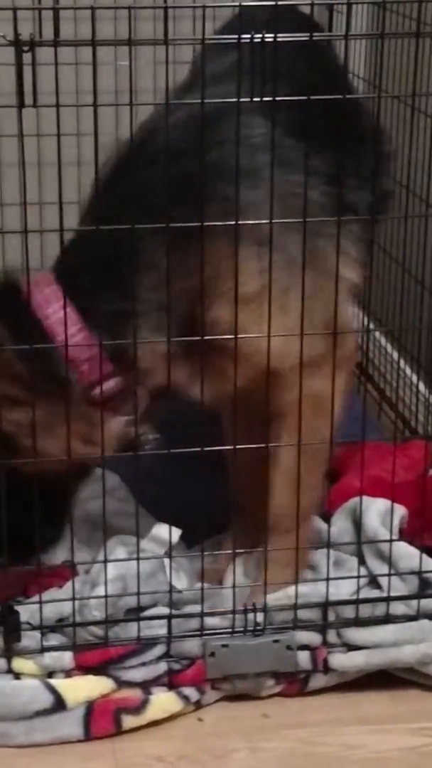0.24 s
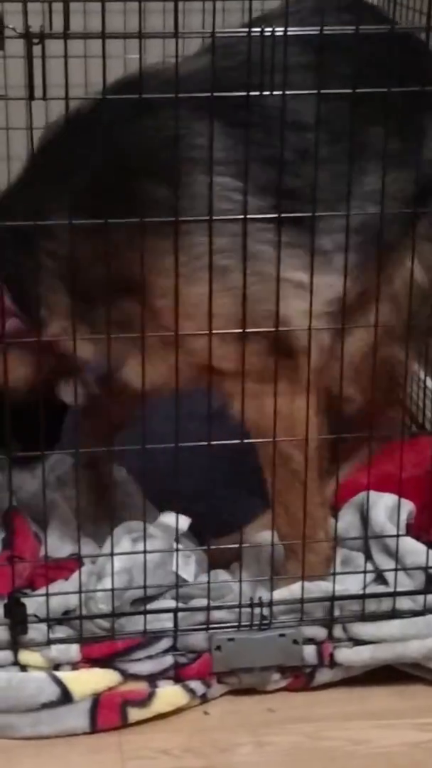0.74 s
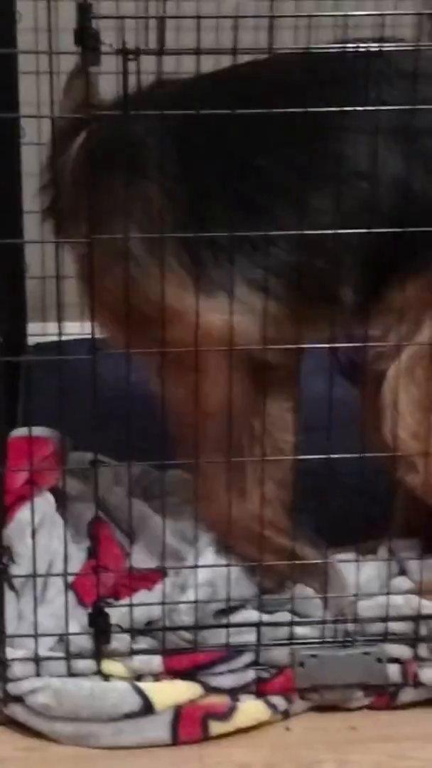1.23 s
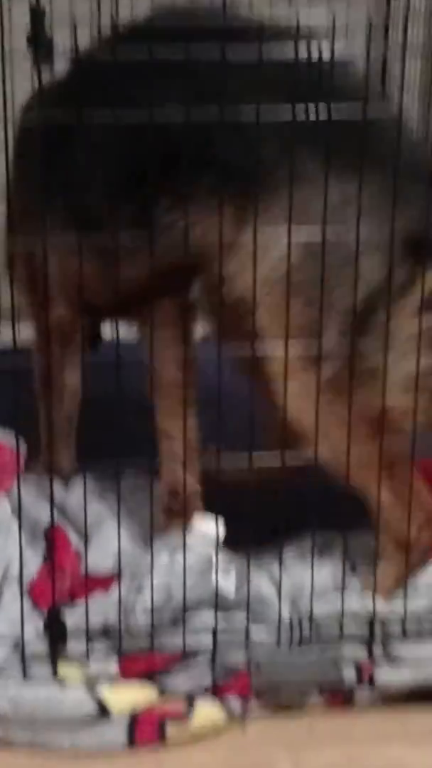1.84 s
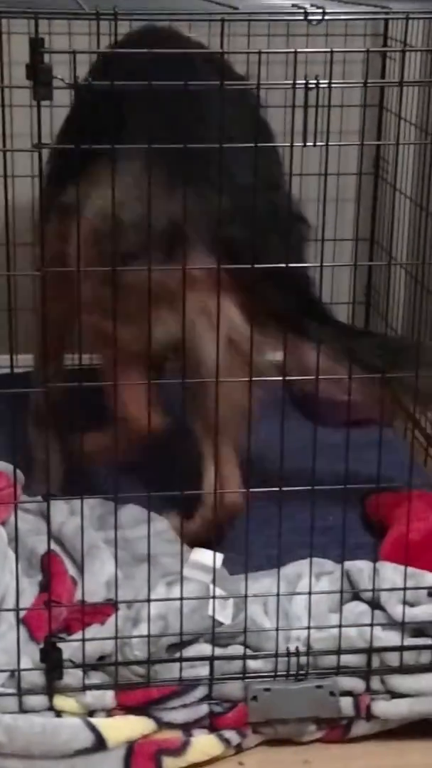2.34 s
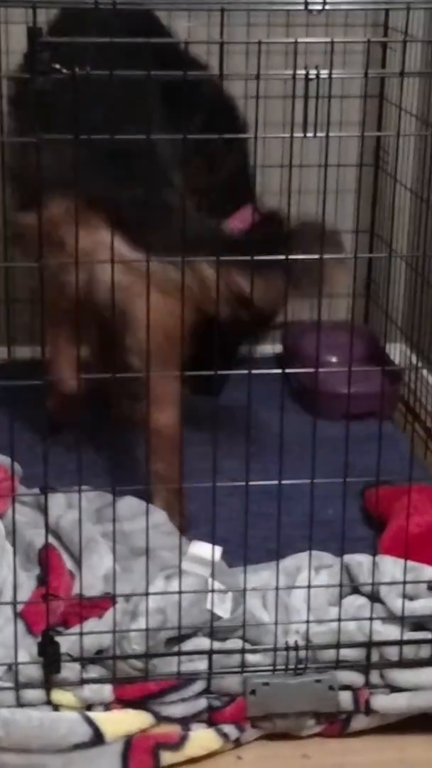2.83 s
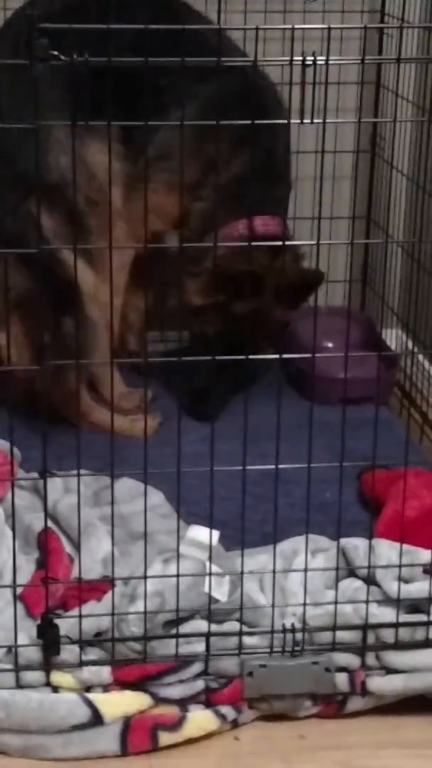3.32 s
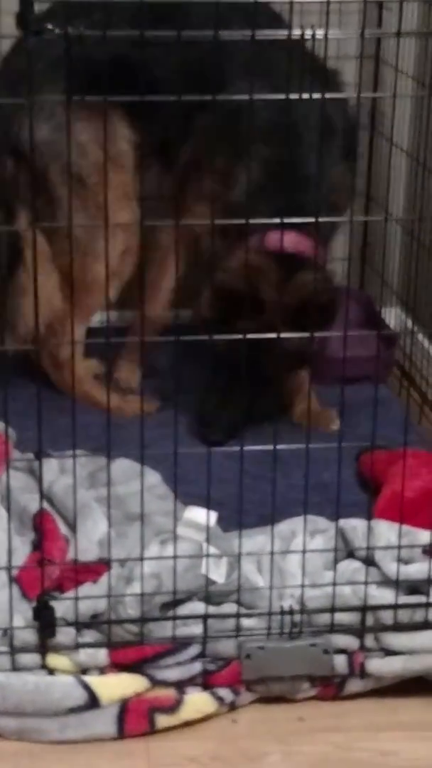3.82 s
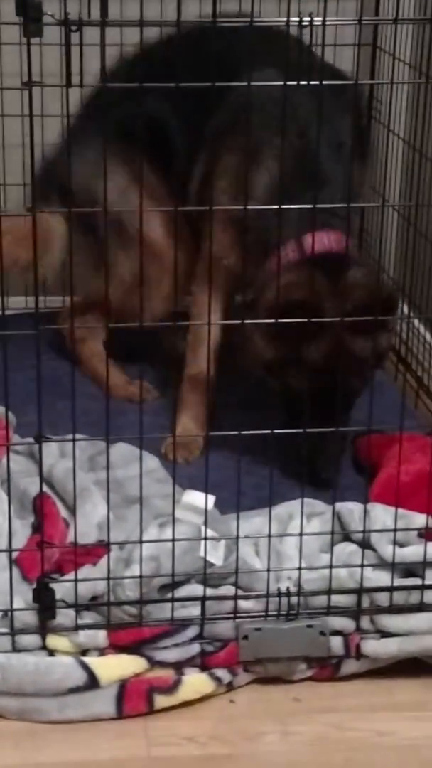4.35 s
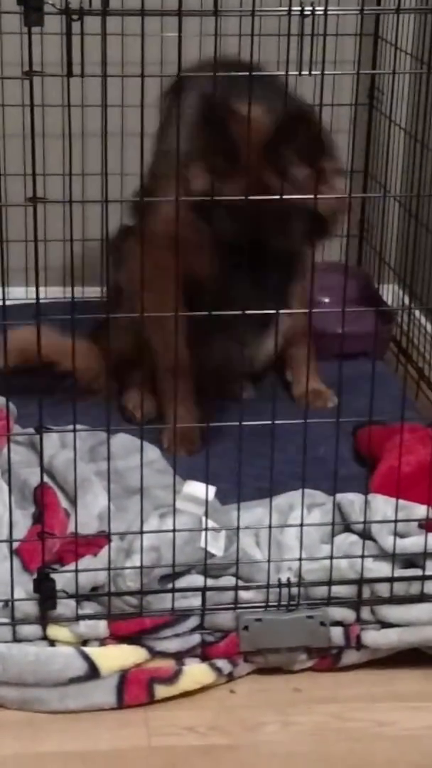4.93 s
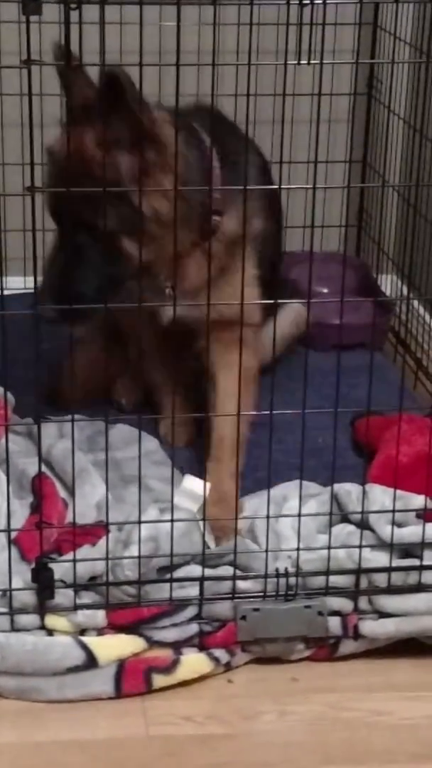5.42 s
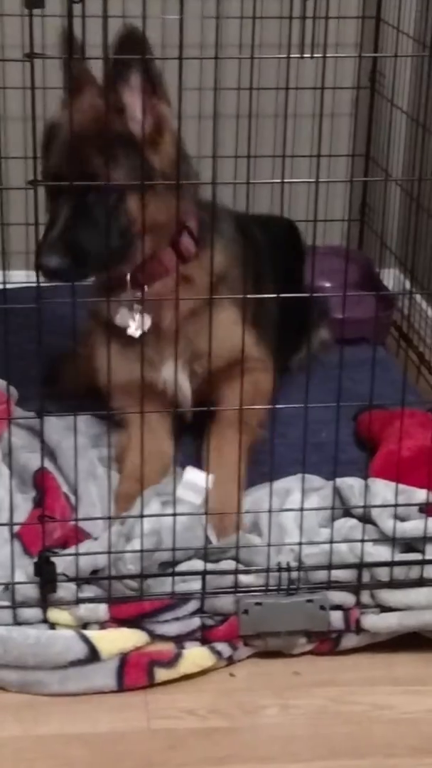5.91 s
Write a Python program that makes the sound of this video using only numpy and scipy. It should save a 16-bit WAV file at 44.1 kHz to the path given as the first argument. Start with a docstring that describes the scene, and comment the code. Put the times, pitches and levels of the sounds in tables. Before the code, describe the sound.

A large dog turns around inside a wire crate in a living room. Its paws thud unevenly on the padded floor tray, which knocks against the frame and makes the wire panels chatter, while a blanket rustles softly between steps. Its nose whistles faintly twice early on, and the heaviest step lands after about two seconds. Near the end the dog lies down with one faint tag clink. The room rings briefly after each bump.

```python
"""A big dog starts to turn round in a wire crate in a living room, its nose whistling faintly twice.
Each paw thuds on the padded floor tray, which knocks on the frame and makes the wire panels chatter.
The heaviest step lands just after two seconds, and the blanket rustles as the paws drag between steps.
Near the end the dog lies down and its collar tag clinks once.
All along, the room rings briefly after each bump, over a soft hush of air."""
import sys
import numpy as np
from scipy import signal
from scipy.fft import rfft, irfft, next_fast_len
from scipy.io import wavfile

SR = 44100
rng = np.random.default_rng(int(sys.argv[2]) if len(sys.argv) > 2 else 0)


def dump_mix(stems):
    """Bounce the given channels to the path in sys.argv[1] as a 16-bit WAV at rate SR."""
    frames = np.atleast_2d(stems).T  # one column per channel
    limited = np.clip(frames, -1, 1)  # hard clip at full scale
    pcm = np.round(limited * 32767).astype(np.int16)
    wavfile.write(sys.argv[1], SR, pcm)


N = 272529
TIME = np.arange(N) / SR   # seconds, for the whole scene
HIT_TIME = np.arange(int(.8 * SR)) / SR   # seconds, for one hit


# Paws and body landing on the tray. Levels compare one step with another; build_s is how slowly it lands.
# start_s, thud_db, pitch_hz, rattle_db, treble_db, knock_db, build_s
STEPS = [(0.16, -26.5, 166, -64, -47, -63, 0.0045), (0.212, -23.5, 274, -40, -33, -39, 0.011),
         (0.514, -37, 172, -65, -43, -65, 0.014), (0.952, -35, 99, -62, -40, -49, 0.0081),
         (1.035, -36.5, 143, -63, -42, -67, 0.009), (1.241, -36, 80, -51, -25, -62, 0.0079),
         (1.665, -25, 209, -45, -30, -40, 0.0078), (1.929, -32, 196, -59, -40, -40.5, 0.0077),
         (2.02, -16.5, 296, -34, -21, -24, 0.0089), (2.143, -29, 230, -57, -36, -39.5, 0.0061),
         (2.213, -3, 254, -22, -25.5, -24.5, 0.01), (2.562, -19, 156, -37.5, -28.5, -30.5, 0.0071),
         (2.967, -22.5, 201, -44, -34, -37.5, 0.011), (3.047, -29.5, 180, -48, -34, -40, 0.0087),
         (3.196, -32.5, 196, -61, -39, -47.5, 0.01), (3.519, -25, 116.5, -54.5, -38, -58, 0.0061),
         (3.737, -17, 114, -35, -30.5, -27, 0.009), (4.199, -17.5, 185, -36.5, -27.5, -29.5, 0.0088),
         (4.718, -28.5, 287, -60, -38, -43, 0.012), (4.841, -41, 188, -54, -29, -42.5, 0.0066),
         (5.333, -13.5, 284, -32, -31.5, -28.5, 0.008), (5.54, -33.5, 197, -54.5, -37, -44, 0.0065),
         (5.794, -24, 179, -41.5, -40.5, -35, 0.0049), (5.945, -23.5, 224, -39, -36.5, -37, 0.0082),
         (6.049, -20.5, 210, -41.5, -36, -36, 0.0095)]

def footfalls(thud_gain_db=19.5, knock_gain_db=20, rattle_gain_db=26, toes_early_s=.00875, bounce_s=.012):
    """The toes touch, the weight lands with a thud, knock and rattle, and the tray bounces once."""
    tray, frame = np.zeros((2, N))
    for start_s, thud_db, pitch_hz, rattle_db, treble_db, knock_db, build_s in STEPS:
        tilt_db_per_octave = (treble_db + 14.5) / 2.6
        tilt_db_per_octave += .11 * max(rattle_db + 31, 0)   # hard rattles are brighter
        bounce_db = -5 - .3 * max(-19 - thud_db, 0)   # light steps bounce less
        bounce_hz = min(pitch_hz, 169.4)   # no higher than the tray's own pitch
        for at_s, db, hz in (start_s, 0, pitch_hz), (start_s + bounce_s, bounce_db, bounce_hz):
            add(tray, at_s, from_db(thud_db + thud_gain_db + db) * thud(hz, build_s))
        for at_s, db in (start_s - toes_early_s, -6.5), (start_s, 0):
            add(frame, at_s, from_db(knock_db + knock_gain_db + db) * knock(build_s))
        for at_s, db in (start_s, 0), (start_s + bounce_s, -14.5):   # the bounce barely shakes the frame
            chatter = rattle(tilt_db_per_octave, delay_s=1.5 * build_s)
            add(frame, at_s, from_db(rattle_db + rattle_gain_db + db) * chatter)
    return tray, frame


# The tones the floor tray rings with: pitch_hz, level_db, ring_s (time to fade by 60 dB)
TRAY_TONES = [(82, -10, .22), (125, -5, .13), (168, 0, .17), (192, -6, .12), (248, 1, .17), (298, -2, .14),
              (345, -4, .12), (410, -7, .1), (475, -6, .12), (532, -3, .15), (630, -11, .12)]

def thud(pitch_hz, build_s, pads_db=-3, ring_db=-3, wobble_share=.17):
    """The tray bends under the soft pads of a paw, then rings on with its tones near that pitch."""
    wobble = np.interp(HIT_TIME * pitch_hz, np.arange(999), rng.standard_normal(999))
    cycles = np.cumsum(pitch_hz * (1 + wobble_share * wobble)) / SR
    bend = paw_force(.68 * build_s) * np.sin(2 * np.pi * cycles)
    pads = paw_force(build_s) * rng.standard_normal(len(HIT_TIME))
    pads = colour(pads, [(40, -40.5), (80, -.5), (300, .5), (450, -6), (1500, -68.5), (6000, -98)])
    fade_in = 1 - np.exp(-(HIT_TIME / build_s) ** 2)
    ring = resonance(struck(TRAY_TONES, uneven_db=3), pitch_hz, width_hz=1.09 * pitch_hz) * fade_in
    mix = unit_energy(bend) + from_db(pads_db) * unit_energy(pads) + from_db(ring_db) * unit_energy(ring)
    return unit_energy(mix)


# The tone colour of the tray's hollow knock: pitch_hz, level_db
KNOCK_COLOUR = [(100, -10.5), (280, -7), (380, 2), (520, 2.5), (620, -5), (760, -11.5), (1500, -18.5),
                (6000, -89)]

def knock(build_s):
    """The hollow middle of the tray is drummed as it flattens against the floor."""
    burst = paw_force(1.21 * build_s) * rng.standard_normal(len(HIT_TIME))
    return unit_energy(colour(burst, KNOCK_COLOUR))


# The tone colour of tray and wires clacking on the frame: pitch_hz, level_db
CLACK_COLOUR = [(100, -13), (300, -9), (520, -3), (740, -9.5), (1050, 5), (1500, 1), (2300, -1.5),
                (2800, -4), (3400, -8.5), (4500, -10.5), (6500, -27.5), (9000, -35), (15000, -59)]
# The strongest tones of the wire panels, muffled by the bedding: pitch_hz, level_db, ring_s
WIRE_TONES = [(941, -3, .22), (1022, -3, .22), (1078, -1, .28), (1275, -2, .25), (1380, -2, .25),
              (1532, 0, .22), (1690, -2, .22), (1915, -3, .2), (2335, -3, .15), (2445, 0, .12),
              (3188, 3, .06)]

def rattle(tilt_db_per_octave, delay_s, taps_per_s=6000, bump_s=.01, settle_s=.0088, wires_db=-6):
    """Loose joints chatter at once; then the tray bumps the frame and sets the wire panels ringing."""
    bump = np.exp(-((HIT_TIME - delay_s) / bump_s) ** 2)
    chatter = .33 * np.exp(-HIT_TIME / settle_s)
    taps = random_clicks(len(HIT_TIME), taps_per_s) * (bump + chatter)
    tilted = [(hz, db + tilt_db_per_octave * np.log2(np.clip(hz, 500, 6000) / 1500))
              for hz, db in CLACK_COLOUR]
    clack = colour(taps, tilted)
    wires = np.interp(HIT_TIME - delay_s, HIT_TIME, struck(WIRE_TONES, uneven_db=4), left=0)
    wires = colour(wires, [(3500, -23), (7000, -19)])   # favours the treble a little
    return unit_energy(unit_energy(clack) + from_db(wires_db) * unit_energy(wires))


def paw_force(build_s):
    """The push of a paw swells to 1 and eases off."""
    progress = HIT_TIME / max(build_s, .002)
    return (progress * np.exp(1 - progress)) ** 2


# How hard the paws drag, and how much the blanket slides: time_s, level_db
PAW_DRAG = [(0.0, -58), (0.29, -48.5), (1.15, -55.5), (1.38, -62), (1.65, -57), (2.06, -47), (2.2, -37.5),
            (2.55, -48), (2.75, -53.5), (3.51, -54), (3.72, -42), (4.01, -58), (4.23, -52), (4.34, -51.5),
            (4.87, -51), (5.83, -56.5), (6.02, -48), (6.18, -46)]
BLANKET_SLIDE = [(0.0, -62), (0.31, -59), (0.46, -64.5), (0.74, -64), (1.24, -60.5), (1.44, -63),
                 (1.69, -77), (1.86, -62), (2.01, -67), (2.2, -66), (2.67, -59), (3.42, -65.5), (3.7, -60),
                 (4.58, -60.5), (4.78, -59.5), (5.39, -61.5), (5.76, -60), (6.18, -65)]
# The tone colours of the paws' dull scuff and the blanket's swish: pitch_hz, level_db
SCUFF_COLOUR = [(50, -10), (120, 5), (260, 2), (400, -4), (700, -16), (1200, -41), (4000, -54.5)]
SWISH_COLOUR = [(150, -19), (500, 0.5), (750, 5), (1000, 5.5), (1350, 2.5), (1700, -4), (2600, -12.5),
                (4000, -20), (8000, -29.5), (15000, -41)]

def bedding(scuff_db=-2.5, swish_db=-1, lumpy_db=1, patchy_db=2.5, snags_per_s=5000):
    """Paws drag in small dull lurches, while threads of the blanket catch and slip."""
    lurches = rng.standard_normal(N) * from_db(lumpy_db * drift(turns_per_s=28))
    scuff = unit_rms(colour(lurches, SCUFF_COLOUR))
    snags = random_clicks(N, snags_per_s) * from_db(patchy_db * drift(turns_per_s=18))
    swish = unit_rms(colour(snags, SWISH_COLOUR))
    scuff *= from_db(over_time(PAW_DRAG) + scuff_db)
    swish *= from_db(over_time(BLANKET_SLIDE) + swish_db)
    return scuff + swish


# The tones of the metal tag: pitch_hz, level_db, ring_s
TAG_TONES = [(5700, -2, .015), (6050, -4, .015), (7250, -2, .015), (7700, -5, .015), (12300, -6, .015),
             (14400, -6, .015), (14950, -7, .12)]
# When the tag clinks: start_s, level_db
CLINKS = [(5.865, -53.5)]

def collar_tag():
    """A small metal tag taps the ring it hangs from."""
    out = np.zeros(N)
    for start_s, level_db in CLINKS:
        clink = struck(TAG_TONES, uneven_db=3)
        add(out, start_s, from_db(level_db) * clink / np.max(np.abs(clink)))
    return out


# Faint whistles from the dog's nose: middle_s, length_s, level_db
NOSE_WHISTLES = [(.45, .11, -61), (1.066, 0.13, -62.5)]

def nose(pitch_hz=1340, width_hz=160):
    """Air through the dog's nose makes a breathy note that swells and fades."""
    swells = sum(from_db(level_db) * np.exp(-(2 * (TIME - middle_s) / length_s) ** 2)
                 for middle_s, length_s, level_db in NOSE_WHISTLES)
    return narrow_noise(pitch_hz, width_hz) * swells


# How long the room rings, from low sounds to high: pitch_hz, ring_s
ROOM_RING = [(100, 0.39), (300, 0.37), (1000, 0.46), (3000, 0.42), (6000, 0.35), (14000, 0.1)]

def room_echo(sound, build_s=.00067):
    """The room stores the energy in each band of pitches and gives it back as noise that dies away."""
    edges_hz = np.geomspace(60, 16000, 25)
    noise = rng.standard_normal((2, N))
    out = np.zeros(N)
    for k, band_hz in enumerate(zip(edges_hz, edges_hz[1:])):
        band_filter = signal.butter(3, band_hz, "band", fs=SR, output="sos")
        energy = signal.sosfilt(band_filter, sound + 1e-12 * noise[0]) ** 2
        ring_s = at_pitch(ROOM_RING, np.sqrt(np.prod(band_hz)))
        for smooth_s in build_s, ring_s / np.log(1e6):   # a quick rise, then a slow fade
            keep = np.exp(-1 / (smooth_s * SR))
            energy = signal.lfilter([1 - keep], [1, -keep], energy)
        out += np.sqrt(energy) * unit_rms(signal.sosfilt(band_filter, noise[k % 2]))
    return out


# The tone colour of still room air with a faint hiss: pitch_hz, level_db
AIR_COLOUR = [(12, -45.5), (20, 3.5), (70, -2), (119, 2.5), (207, -6.5), (298, -5.5), (393, -17),
              (465, -7.5), (614, -22.5), (1230, -21), (2150, -27.5), (9130, -40.5), (10500, -41),
              (15500, -43)]

def background(air_db=-54, rumble_db=-59, whine_db=-88):
    """Room air, a low rumble of the floor as the dog shifts its weight, and a thin electrical whine."""
    air = unit_rms(colour(rng.standard_normal(N), AIR_COLOUR))
    rumble = narrow_noise(pitch_hz=28, width_hz=30)
    whine = unit_rms(resonance(rng.standard_normal(N), pitch_hz=10750, width_hz=250))
    drag_db = over_time(PAW_DRAG)
    swell_db = .44 * (drag_db - drag_db.mean())
    return from_db(air_db) * air + from_db(rumble_db + swell_db) * rumble + from_db(whine_db) * whine


def struck(tones, uneven_db):
    """A struck object rings with fading tones; each hit shares its strength among them differently."""
    pitch_hz, level_db, ring_s = np.transpose(tones)[:, :, None]
    gain = from_db(level_db + uneven_db * rng.standard_normal(pitch_hz.shape))
    gain *= rng.choice([-1, 1], pitch_hz.shape)
    fade = np.exp(-np.log(1000) * HIT_TIME / ring_s)
    return unit_energy(np.sum(gain * fade * np.sin(2 * np.pi * pitch_hz * HIT_TIME), axis=0))


def colour(sound, levels):
    """Make each pitch louder or softer, following rows of pitch_hz, level_db."""
    size = 2 * next_fast_len(len(sound))
    gains = from_db(at_pitch(levels, np.fft.rfftfreq(size, 1 / SR)))
    cepstrum = irfft(np.log(gains))
    # Folding this onto its first half keeps the filter from sounding before the hit.
    cepstrum[1:size // 2] *= 2
    cepstrum[size // 2 + 1:] = 0
    return irfft(rfft(sound, size) * np.exp(rfft(cepstrum)))[:len(sound)]


def resonance(sound, pitch_hz, width_hz):
    """Bring out the part of a sound near one pitch."""
    keep = np.exp(-np.pi * width_hz / SR)
    return signal.lfilter([1, 0, -1], [1, -2 * keep * np.cos(2 * np.pi * pitch_hz / SR), keep ** 2], sound)


def narrow_noise(pitch_hz, width_hz):
    """Noise filtered twice around one pitch."""
    once = resonance(rng.standard_normal(N), pitch_hz, width_hz)
    return unit_rms(resonance(once, pitch_hz, width_hz))


def random_clicks(samples, per_s):
    """Tiny clicks of random timing and strength."""
    return (rng.random(samples) < per_s / SR) * rng.standard_normal(samples)


def drift(turns_per_s):
    """A curve that wanders at random, about 1 in size."""
    return unit_rms(np.interp(TIME * turns_per_s, np.arange(1000), rng.standard_normal(1000)))


def at_pitch(table, pitch_hz):
    """Read between a table's rows, with octaves evenly spaced."""
    pitches, values = np.transpose(table)
    return np.interp(np.log(np.maximum(pitch_hz, 1)), np.log(pitches), values)


def over_time(table):
    """Join a table's rows into one value per sample."""
    return np.interp(TIME, *np.transpose(table))


def from_db(db):
    """Turn decibels into a multiplier."""
    return 10 ** (np.asarray(db) / 20)


def unit_rms(sound):
    """Scale to an average power of 1."""
    return sound / np.sqrt(np.mean(sound ** 2) + 1e-20)


def unit_energy(sound):
    """Scale to a total energy of 1."""
    return sound / np.sqrt(np.sum(sound ** 2) + 1e-20)


def add(out, start_s, sound):
    """Mix a sound in at a given time."""
    start = max(round(start_s * SR), 0)
    out[start:start + len(sound)] += sound[:N - start]


def scene(tray_echo_db=-10, frame_echo_db=-2):
    """The tray is heard mostly directly; the open wire frame sends its sound all round the room."""
    tray, frame = footfalls()
    frame = frame + collar_tag()
    echoes = room_echo(from_db(tray_echo_db) * tray + from_db(frame_echo_db) * frame)
    return (tray + frame + echoes + bedding() + nose() + background())[None]


def record(dry, cutoff_hz=15550):
    """Cut away the very highest treble."""
    return signal.sosfilt(signal.ellip(10, .1, 70, cutoff_hz, fs=SR, output="sos"), dry)


dry = scene()
out = record(dry)
dump_mix(out)
```